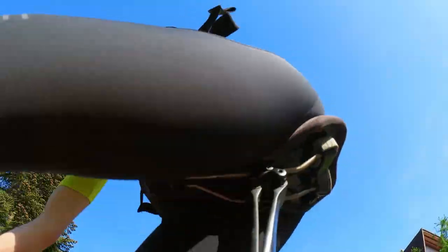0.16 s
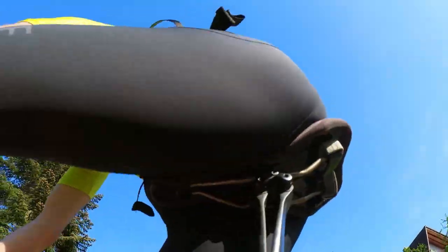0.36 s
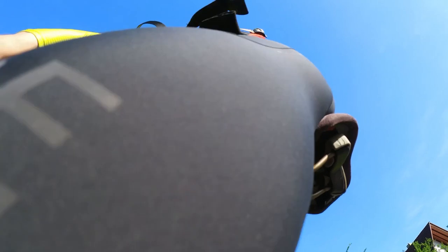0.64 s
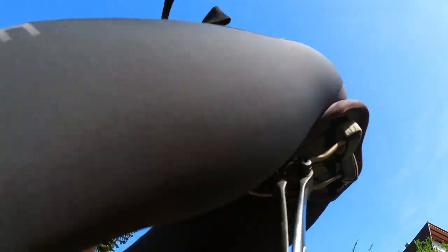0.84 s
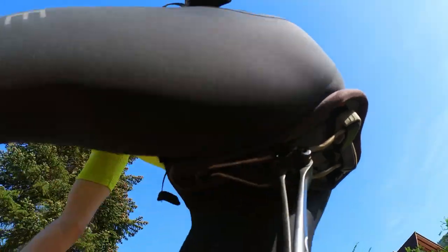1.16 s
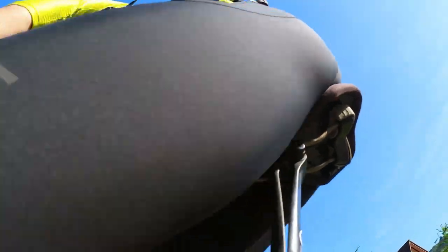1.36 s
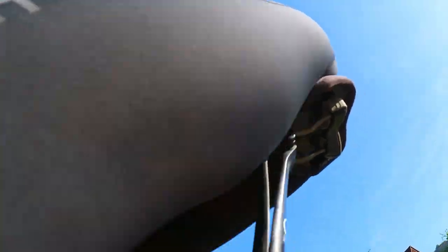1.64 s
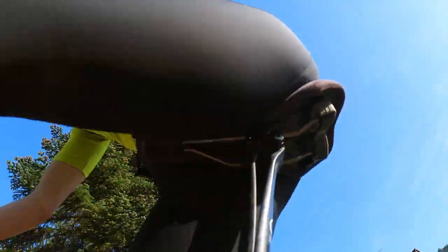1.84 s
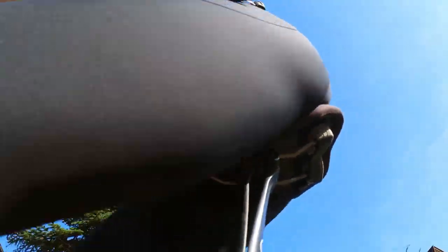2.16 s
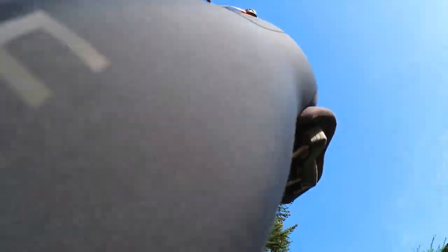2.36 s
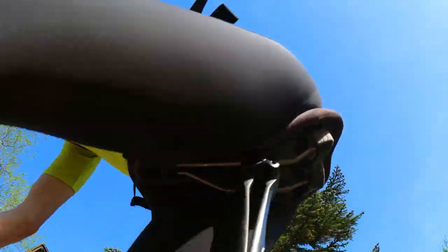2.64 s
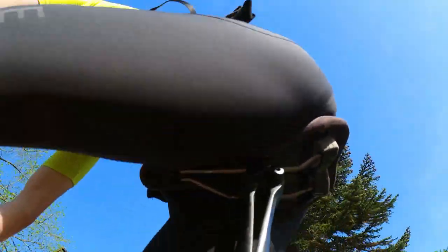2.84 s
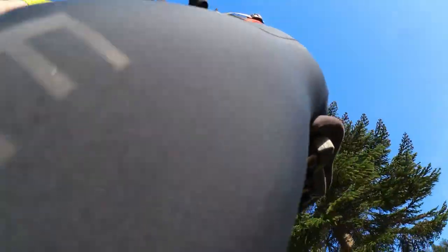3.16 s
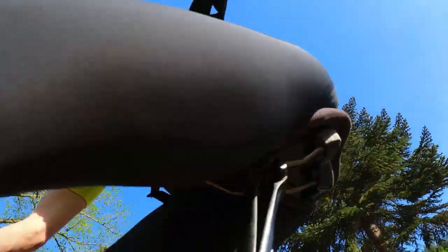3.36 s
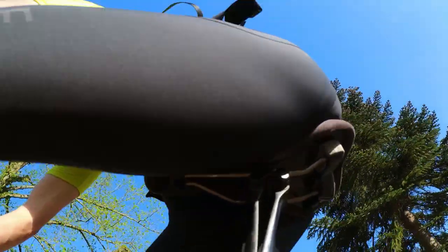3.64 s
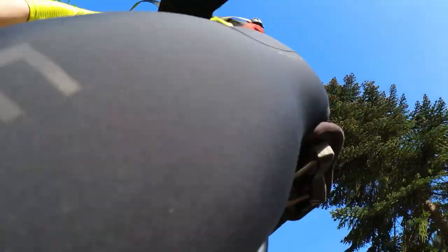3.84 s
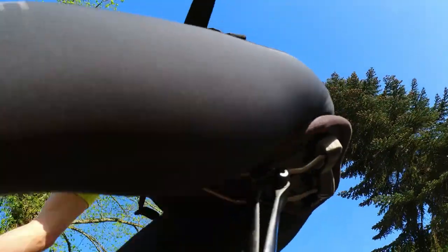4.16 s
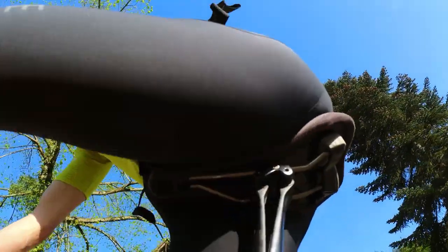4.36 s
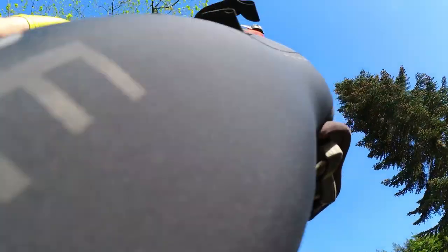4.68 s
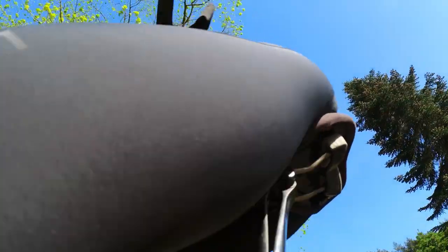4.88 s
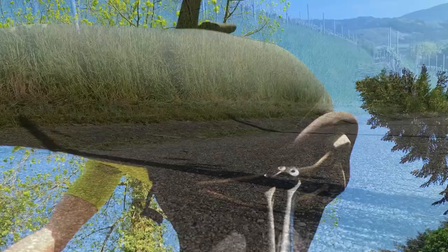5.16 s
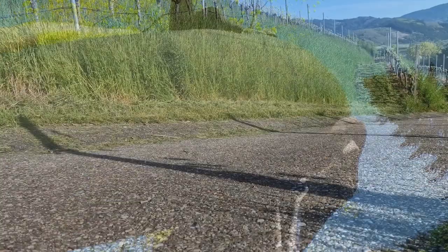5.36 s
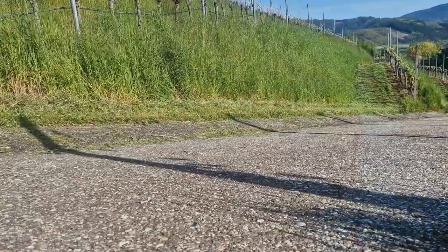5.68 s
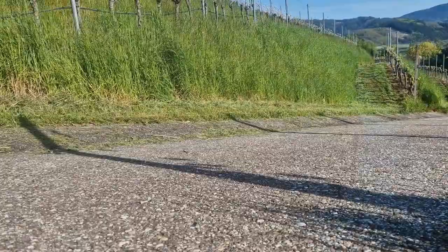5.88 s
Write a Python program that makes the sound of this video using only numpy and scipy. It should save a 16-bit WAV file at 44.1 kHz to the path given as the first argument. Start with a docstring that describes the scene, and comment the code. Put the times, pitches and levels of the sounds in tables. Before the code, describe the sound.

A harsh rattling burst clicks off into a road bike rumbling over asphalt, chain clacking and grit ticking, until an abrupt cut leaves low wind gusts.

```python
"""A road bike rolls along an asphalt lane, heard by a pair of microphone ports clamped to its frame.
First a loud, wide rattling rush clatters with jolts, ends in a knock and breaks off with a click.
Then the ride: asphalt noise excites the frame's resonances, a two-partial tone hums for the drive, impacts ring
the chain and grit ticks in step with the drive; the sound narrows to the centre now and then, under a limiter.
Late on, wind turbulence rises; the sound of the ride is cut off abruptly, leaving gusts and faint field air."""
import sys
import numpy as np
from scipy import signal
from scipy.fft import rfft, irfft, next_fast_len
from scipy.io import wavfile
from scipy.ndimage import uniform_filter1d, minimum_filter1d

SR = 44100
rng = np.random.default_rng(int(sys.argv[2]) if len(sys.argv) > 2 else 0)


def master(y):
    """Save y as 16-bit WAV."""
    cut = np.clip(np.atleast_2d(y).T, -1, 1)
    pcm = np.round(cut * 32767)  # scale
    wavfile.write(sys.argv[1], SR, pcm.astype(np.int16))


N = 265261
RIDE_START_S, RIDE_END_S = 0.0765, 5.637
T = np.arange(N) / SR
SIZE = next_fast_len(N + 8192)  # padded length of the Fourier transforms
FREQ = np.maximum(np.arange(SIZE // 2 + 1) * SR / SIZE, 1)
LEFT_RIGHT = np.array([[1], [-1]])


# Spectrum of the road's rumble in the frame. Each row: frequency in Hz, relative density in dB per Hz.
RUMBLE = [(20, -23), (50, -19), (66, -10), (86, 2), (130, 3.5), (185, 4), (215, -10), (300, -8.5),
          (390, -4.5), (470, -12), (580, -17), (730, -13), (900, -27), (1300, -40.5)]
# Rough patches of asphalt. Each row: middle in seconds, half length in seconds, rise in dB.
PATCHES = [(1.217, .06, 3.5)]
# Slack chain rattling against the frame. Each row: middle in seconds, half length in seconds, level in dB.
RATTLES = [(0.464, 0.034, -43), (1.22, 0.046, -44), (1.538, 0.035, -50), (2.008, 0.024, -46.5),
           (2.092, 0.021, -38.5), (2.204, 0.059, -53), (2.81, 0.028, -47), (3.63, 0.13, -48.5),
           (4.452, 0.14, -49), (4.635, 0.048, -48), (5.26, 0.094, -50)]
# Modes of a bump's dull thud. Each row: frequency in Hz, width in Hz, relative gain in dB.
THUD = [(430, 150, 0), (735, 150, -12)]


def road():
    """Forced vibration: asphalt, bumps and slack chain drive the frame, which rumbles, rings and crunches."""
    times, thud_db, ring_db = bumps(count=12)
    texture = walk(45)
    rough_db = sum(db * bell(s, half_s) for s, half_s, db in PATCHES)
    rumble = shake(undb(-26.0 + 1.0 * texture + rough_db), colour(RUMBLE))

    frame = frame_response()
    chatter = undb(-51.5 + 2 * texture) * crackle(count=7000, spread_db=4.0, decay_s=0.008)
    rattle_level = sum(undb(db) * bell(s, half_s) for s, half_s, db in RATTLES)
    rattle = rattle_level * crackle(count=2400, spread_db=-2.5, decay_s=0.0023)
    bump_force = blows(times, undb(ring_db), decay_s=0.003)
    ring = shake(chatter, frame) + shape((rattle + bump_force) * noise(), frame)

    jolt = blows(times, undb(thud_db), decay_s=0.0096)
    push = blows(times, undb(thud_db + 12), decay_s=.00004)
    thuds = shape(push + undb(-8) * jolt * noise(), resonances(THUD) * colour(MOUNT))
    # squaring the jolt makes only the hard bumps crunch
    crunch_colour = colour([(1500, -9), (2500, 5), (3000, -9), (4500, -13), (16000, -9)])
    crunch = shape(undb(-9) * jolt ** 2 * noise(), crunch_colour)
    return rumble + ring + thuds + crunch + knock(0.3018, db=-17)


# The larger bumps. Each row: time in seconds, relative thud level in dB, relative frame ring level in dB.
BUMPS = [(0.203, -26, -39), (1.24, -39, -35), (1.496, -25, -31), (1.778, -11, -33), (2.867, -26, -52),
         (3.434, -32, -55), (4.164, -45, -38), (4.444, -32, -49), (4.587, -30, -52), (5.218, -39, -49),
         (5.519, -38, -53), (5.604, -23.5, -51)]


def bumps(count):
    """Random excitation: times, thud and ring levels of the larger bumps and of lesser ones strewn between."""
    when = rng.uniform(RIDE_START_S, RIDE_END_S, count)
    lesser_thud_db, lesser_ring_db = -37, -58
    levels = np.array([lesser_thud_db, lesser_ring_db]) + 1 * rng.standard_normal((count, 2))
    return np.vstack([BUMPS, np.column_stack([when, levels])]).T


# Hum of the drive, following the pedalling speed. Each row: time in seconds, mean pitch in Hz.
DRIVE = [(0.08, 156.2), (0.38, 149.9), (0.6, 155.8), (0.85, 151.0), (1.15, 141.0), (1.6, 140.0),
         (2.0, 145.5), (2.3, 144.9), (2.8, 153.2), (3.35, 155.7), (3.55, 153.2), (3.87, 156.6),
         (4.3, 151.6), (4.85, 147.1), (5.6, 143.2)]
# Swells of the frame's boom. Each row: time in seconds, rise in dB.
SWELLS = [(0.679, 13.5), (1.35, 7.5), (1.94, 10.5), (3.199, 6.5), (3.57, 2), (4.05, 10.5), (4.88, 2.5)]
SWELL_S = 0.07  # half length of a swell
HUM_DB, HUM_WAVER_DB, BOOM_DB = -27, 1.5, -31.5  # resting levels of hum and boom, random waver of the hum
HUM_YIELD = 0.42  # dB the hum sinks per dB of swell


def drive():
    """Periodic meshing: the chain hums with a faint octave; a frame resonance booms and the hum yields to it."""
    swell_db = sum(db * bell(s, SWELL_S) for s, db in SWELLS)
    pitch_hz = curve(DRIVE) * (1 + 0.0069 * walk(25.275))
    phase = 2 * np.pi * np.cumsum(pitch_hz) / SR
    tone = np.sqrt(2) * (np.sin(phase) + undb(-18) * np.sin(2 * phase))
    hum = tone * undb(HUM_DB - HUM_YIELD * swell_db + HUM_WAVER_DB * walk(14))
    boom = shape(noise(), resonances([(178.9, 24.0, 0)])) * undb(BOOM_DB + swell_db)
    return hum + boom


def hum_cycles():
    """Phase as integrated frequency: cycles of the drive's mean pitch gone by, which set the jockey wheel's turn."""
    return np.cumsum(curve(DRIVE)) / SR


# Ringing of the chain against its cogs. Each row: frequency in Hz, width in Hz, relative gain in dB.
CHAIN = [(1060, 240, -1), (1810, 42, 4), (2237, 228, 19.5), (2200, 110, -7), (5550, 720, -20.5),
         (13300, 470, -18)]
SNAP_PITCH_SPREAD, BOUNCE_PITCH_SPREAD = .022, .1  # relative pitch spread
BOUNCE_S, BOUNCE_DB = .0036, -7.5  # mean delay and level step from one bounce to the next


def chain():
    """Impact and rebound: links snap onto cogs, bounce twice and scrape; faint ticks and rattle run throughout."""
    times, db = clacks()
    body = resonances(CHAIN) * colour(MOUNT)
    snaps = strike(times, db + 4, CHAIN, 1 + SNAP_PITCH_SPREAD * rng.standard_normal(len(times)))
    for k in (1, 2):
        late, size, pitch = rng.uniform(-1.1, 1, (len(times), 3)).T
        bounce_times = times + BOUNCE_S * (k + late / 3)
        bounce_db = db + k * BOUNCE_DB + 4 * size
        snaps += strike(bounce_times, bounce_db, CHAIN, 1 + BOUNCE_PITCH_SPREAD * (pitch - .5))
    weak = scatter(count=70, db=-53, spread_db=3, pitch_spread=.13, modes=CHAIN)
    scrape = shape(blows(times, undb(db - 16.0), decay_s=0.009) * noise(), body)
    rattle = shake(undb(-64.5) * crackle(count=360, spread_db=2.5, decay_s=0.01), body)
    return snaps + weak + scrape + rattle


# Stiff links snapping twice onto a cog. Each row: start in seconds, relative levels in dB of first and second snap.
CLACKS = [(0.3278, -46, -40.5), (0.409, -34, -30), (0.489, -45, -55), (0.963, -48, -52),
          (1.392, -37.5, -42), (1.9075, -52, -42.5), (1.996, -49, -44), (2.0714, -32.5, -30.5),
          (2.1560, -41, -40), (2.2380, -37.5, -36.5), (2.6490, -37, -38), (2.7302, -41.5, -39),
          (2.977, -52, -43), (3.0133, -51, -43), (3.1030, -60, -39.5), (3.6722, -38, -36),
          (3.7480, -34, -30), (3.8250, -40.5, -43), (4.3002, -37.5, -37), (4.3803, -37.5, -35.5),
          (5.2828, -38, -35), (5.3676, -30.5, -31.5), (5.4500, -45, -40.5)]
SNAP_CYCLES = 2  # hum cycles between the two snaps


def clacks():
    """Kinematic spacing: times and levels of paired snaps, their gap set by the speed of the chain."""
    start, first_db, second_db = np.transpose(CLACKS)
    gap_s = SNAP_CYCLES / np.interp(start, *np.transpose(DRIVE))
    return np.r_[start, start + gap_s], np.r_[first_db, second_db]


# Further ticks of the dry jockey wheel, mostly its hardest. Each row: time in seconds, relative level in dB.
TICKS = [(0.194, -33.5), (0.475, -33.5), (0.628, -40.5), (0.7505, -37.5), (0.866, -44.5), (1.031, -54.5),
         (1.140, -44.5), (1.333, -37.5), (1.633, -41.5), (1.777, -25), (1.934, -35), (2.140, -38.5),
         (2.391, -41), (2.514, -38.5), (2.614, -38), (2.676, -48), (2.776, -46.5), (2.796, -54),
         (2.894, -43.5), (2.953, -43), (2.968, -43), (2.992, -45.5), (3.068, -34.5), (3.442, -49),
         (3.621, -36), (3.717, -42.5), (3.871, -45), (3.991, -42.5), (4.031, -40), (4.146, -45.5),
         (4.166, -33), (4.546, -45.5), (4.607, -33), (4.649, -29), (4.730, -43), (5.310, -46.5)]
# Colour of the grit. Each row: frequency in Hz, relative density in dB per Hz.
GRIT = [(1600, -0.5), (3450, -10), (4650, -18.5), (5650, -8.5), (6550, -18.5), (7150, -7.5), (7700, -12.5),
        (8550, -12.5), (9120, -7.5), (10100, -16), (11500, -11), (12900, -2.5), (15000, -4), (16000, -6)]
# Grain sizes, coarse to fine. Each row: lowest and highest frequency in Hz, relative spray after a tick in dB.
GRAINS = [(0, 4700, -30), (4700, 6500, -28), (6500, 11500, -24), (11500, 13800, -20), (13800, 17000, -19)]
# One lone grain snapping. Each row: frequency in Hz, width in Hz, relative gain in dB.
GRAIN_SNAP = [(7150, 1100, -8), (9100, 1200, -8), (13200, 2200, 0)]
SCRAPE_DB, SCRAPE_TURN = 1, 0.55  # the grit swells once a turn of the wheel: depth, and where in the turn


def grit():
    """Granular noise: ticks trail a fine spray, each grain size crackles over tyre hiss, and lone grains snap."""
    times, db = np.vstack([TICKS, wheel_ticks()]).T
    response = colour(GRIT)
    tick_colour = response * colour([(3000, -13), (8000, -7), (13000, 3.5), (16000, 2.5)])
    out = shake(blows(times, undb(db - 8.0), decay_s=0.0055), tick_colour)
    out = out + scatter(count=300, db=-57.5, spread_db=3.3, pitch_spread=.14, modes=GRAIN_SNAP)

    spray = blows(times, undb(db), decay_s=0.0081)
    turns = hum_cycles() / CYCLES_PER_TURN
    scrape_db = SCRAPE_DB * np.cos(2 * np.pi * (turns - SCRAPE_TURN))
    for low_hz, high_hz, spray_db in GRAINS:
        band = response * ((FREQ >= low_hz) & (FREQ < high_hz))
        share = np.sqrt(np.sum(band ** 2) / np.sum(response ** 2))
        grain_level = undb(-66.5 + scrape_db + 1.4 * walk(22)) + undb(spray_db + 4.5) * spray
        grains = grain_level * crackle(count=1500, spread_db=4.0, decay_s=0.0066)
        hiss = undb(-64.5 + scrape_db + 2.6 * walk(24))
        out = out + share * shake(hiss + grains, band)
    return out


# A dry jockey wheel's round of seven ticks. Each entry: mean relative level in dB.
WHEEL_TICKS = [-55, -47.5, -48.5, -45.5, -49.5, -53, -51]
TICK_SCATTER_DB = 4.5
CYCLES_PER_TURN = 21.2  # hum cycles per turn of the wheel


def wheel_ticks():
    """Rotational periodicity: rows (s, dB) of the wheel's uneven round of ticks, their levels never quite alike."""
    steps = hum_cycles() / CYCLES_PER_TURN * len(WHEEL_TICKS)
    k = np.arange(1, int(steps[-1]))
    db = np.array(WHEEL_TICKS)[k % len(WHEEL_TICKS)] + TICK_SCATTER_DB * rng.standard_normal(len(k))
    return np.column_stack([np.interp(k, steps, T), db])


# Width of the ride. Each row: time in seconds, side gain in dB.
SPREAD = [(0.1, -1.5), (1.0, 0), (2.6, -1), (5.6, 0)]
# Moments when all but the treble narrows to the centre. Each row: start in seconds, end in seconds.
NARROW = [(0.225, 0.275), (0.42, 0.485), (1.11, 1.325), (1.505, 1.66), (1.71, 1.765), (1.995, 2.125),
          (4.36, 4.395), (4.555, 4.615), (5.08, 5.135)]
NARROW_BELOW_HZ, NARROW_FADE_S = 3200, .02


def image(x):
    """Mid-side stereo: the side level drifts through the ride, its lower part briefly removed now and then."""
    mid, side = (x[0] + x[1]) / 2, (x[0] - x[1]) / 2
    low_side = irfft(rfft(side, SIZE) * (FREQ < NARROW_BELOW_HZ), SIZE)[:N]
    narrow = sum(1. * ((T > start) & (T < end)) for start, end in NARROW)
    narrow = uniform_filter1d(narrow, int(NARROW_FADE_S * SR))
    return mid + LEFT_RIGHT * (side - narrow * low_side) * undb(curve(SPREAD))


# Spectrum of the opening rush. Each row: frequency in Hz, relative density in dB per Hz.
RUSH = [(25, -35), (78, 2), (115, -4), (165, 4), (230, -13.5), (320, -9.5), (400, -8.5), (560, -11.5),
        (690, -18), (780, -3.5), (920, -35), (1300, -27), (1850, -32), (2500, -46)]
# Width of the rush. Each row: frequency in Hz, side minus mid in dB.
RUSH_WIDTH = [(60, -14), (170, -12), (250, -5), (400, 0), (560, 11), (680, -12), (780, 5.5), (1000, 1),
              (1850, -1), (2450, 9), (4400, -9), (16000, 1)]
# Jolts clattering through the rush. Each row: time in seconds, peak in dB before mount and limiter.
JOLTS = [(0.0055, -16), (0.0175, -16), (0.0235, -16), (0.0335, -10), (0.044, -16), (0.054, -13)]
# The mount ringing after each jolt. Each row: frequency in Hz, width in Hz, relative gain in dB.
CLATTER = [(410, 190, 0), (760, 150, 2), (990, 120, -11), (1870, 190, -13)]


def rush():
    """Broadband excitation: a wide rumble, clattering jolts, a scrape and a thin sizzle, ending in a knock."""
    body = shake(undb(-12.0 + 1.1 * walk(107)), colour(RUSH), RUSH_WIDTH)
    times, db = np.transpose(JOLTS)
    clatter = strike(times, db, CLATTER, 1 + .03 * rng.standard_normal(len(times)))
    jerks = crackle(count=2200, spread_db=1.5, decay_s=0.003)
    scrape = shake(undb(-34.5) * jerks, frame_response(), RUSH_WIDTH)
    sizzle_colour = colour(GRIT) * colour([(3000, 3), (8000, -6.0), (13000, 3.0), (16000, 6.0)])
    sizzle = shake(undb(-37.5 + 1.5 * walk(100)), sizzle_colour, RUSH_WIDTH)
    last = knock(0.0628, db=-12.5)
    return limiter(body + clatter + scrape + sizzle + last, ceiling_db=-7.5, hold_s=0.0034)


# First crack of a hard knock on the frame. Each row: frequency in Hz, width in Hz, relative gain in dB.
CRACK = [(850, 220, 3), (1650, 480, 1), (2250, 520, -3)]
# Body of that knock. Each row: frequency in Hz, width in Hz, relative gain in dB.
KNOCK = [(450, 95, 0), (800, 170, -11), (1160, 110, -12), (2050, 300, -19)]


def knock(s, db):
    """Two-stage impact: a sharp crack, then the frame rings with a low body as the part seats."""
    return strike(s, db, CRACK) + strike(s + .004, db, KNOCK)


def cut_clicks():
    """Step discontinuity: a dry click where the sounds of the rush and the ride are each cut off."""
    return blows([RIDE_START_S, RIDE_END_S], -undb([-20, -34]), decay_s=0.0004)


# Wind on the microphone. Each row: time in seconds, mean level in dB.
GUST = [(4.9, -77), (5.02, -34), (5.3, -36), (5.6, -36), (5.638, -48), (5.652, -48), (5.657, -28),
        (5.7, -28), (5.735, -37.5), (5.79, -35), (5.87, -35), (5.93, -32), (6.01, -37.5)]
# Spectrum of the wind. Each row: frequency in Hz, relative density in dB per Hz.
WIND = [(15, -22.5), (45, -4), (80, 0.5), (125, -8), (180, -13), (250, -26.5), (400, -36.5), (1000, -48.5),
        (2500, -84.5)]
# Brief flutters of air across the ports. Each row: middle in seconds, half length in seconds, level in dB.
FLUTTERS = [(5.657, .004, -45), (5.827, .006, -54)]
# Spectrum of a flutter. Each row: frequency in Hz, relative density in dB per Hz.
FLUTTER = [(300, 3), (700, -10), (1400, -21)]
# Single eddies thumping the microphone. Each row: time in seconds, pitch in Hz, level in dB, left minus right in dB.
EDDIES = [(5.035, 48, -26, 4), (5.085, 90, -20, 0), (5.31, 70, -22, 2), (5.667, 70, -20.5, -11),
          (5.694, 64, -16, -10), (5.841, 64, -19.5, 0)]


def wind():
    """Turbulent pressure: low uneven noise and brief flutters at the ports, and eddies that push and pull."""
    unsteady_db = 1.5 * walk(45)
    width = [(20, -21.5), (300, -12.5), (1200, -10.5), (16000, -7.5)]
    out = shake(undb(curve(GUST) + unsteady_db), colour(WIND), width)
    flutter_level = sum(undb(db) * bell(s, half_s) for s, half_s, db in FLUTTERS)
    out = out + shape(flutter_level * noise(), colour(FLUTTER))
    for s, hz, db, pan_db in EDDIES:
        cycles = (T - s) * hz
        eddy = np.sin(2 * np.pi * cycles) * np.exp(-(cycles / 0.52) ** 2)
        out = out + eddy * undb(db + LEFT_RIGHT * pan_db / 2)
    return out


# Spectrum of distant air and rustling grass. Each row: frequency in Hz, relative density in dB per Hz.
FIELD = [(200, 5), (1100, 0.5), (2000, -3.5), (2750, -9.5), (3400, -3.5), (4600, -15), (6200, -19),
         (8000, -8), (10000, -23.5), (16000, -26.5)]
# Loudness of that air and grass. Each row: time in seconds, mean level in dB.
RUSTLE = [(4.9, -83), (5.26, -66), (5.8, -66), (5.85, -63.5), (6.01, -66.5)]


def field():
    """Diffuse sound: faint air and grass as independent flickering noise in each ear, rising late."""
    air = np.array([shape(noise() * undb(1.6 * walk(24)), colour(FIELD)) for _ in range(2)])
    return air * undb(curve(RUSTLE) + 1.2 * walk(8.3))


# Ringing of frame and mount. Each row: frequency in Hz, width in Hz, relative gain in dB.
FRAME = [(1020, 60, 2), (1160, 28, -0.5), (1473, 150, -14), (1714, 235, -5.5), (1852, 130, 4.5),
         (2083, 82, -14), (2240, 100, -20.5), (2400, 390, -7)]
# What the microphone mount lets through from the frame. Each row: frequency in Hz, gain in dB.
MOUNT = [(2480, -10.5), (2950, -22.5), (4800, -5.5), (5600, -1.5), (16000, -4)]


def frame_response():
    """Modal superposition: magnitudes of the frame's modes added up, heard through the mount."""
    return sum(abs(resonances([mode])) for mode in FRAME) * colour(MOUNT)


# Width of the ride before it is narrowed. Each row: frequency in Hz, side minus mid in dB.
WIDTH = [(30, -2), (90, -18), (170, -20.5), (230, 1.5), (400, -12), (600, -7.5), (740, -13.5), (950, 0),
         (1050, -15), (1300, -5), (2200, -15), (4500, -6.5), (10000, -5.5), (16000, -10.5)]


def shake(force, response, width=WIDTH):
    """Partial coherence: random contact of given strength rings a body; the two ports hear it partly alike."""
    side_response = response * colour(width)
    share = np.sum(abs(side_response) ** 2) / np.sum(abs(response) ** 2)
    mid = shape(force * noise(), response)
    side = np.sqrt(share) * shape(force * noise(), side_response)
    return (mid + LEFT_RIGHT * side) / np.sqrt(1 + share)


def strike(times, db, modes, pitch=1):
    """Modal impact: soft-onset decaying tones of given peak and relative pitch, passed through the mount."""
    out, age = np.zeros(N), np.arange(2048) / SR
    for s, peak_db, stretch in np.broadcast(times, db, pitch):
        tone = 0
        for hz, width, gain_db in modes:
            envelope = width ** 3 * age ** 2 * np.exp(-1.5 * np.pi * width * age)
            tone = tone + undb(gain_db) * envelope * np.sin(2 * np.pi * hz * stretch * age)
        part = out[int(max(s, 0) * SR):][:len(age)]
        part += (undb(peak_db) * tone / abs(tone).max())[:len(part)]
    mount = colour(MOUNT)
    return irfft(rfft(out, SIZE) * mount / mount[0], SIZE)[:N]


def scatter(count, db, spread_db, pitch_spread, modes):
    """Random impacts: small blows at random moments and pitches, a few far harder than the rest."""
    when, size, pitch = rng.random((count, 3)).T
    peak_db = db - spread_db * np.log(np.maximum(size, .04))
    return strike(when * N / SR, peak_db, modes, 1 + pitch_spread * (2 * pitch - 1))


def crackle(count, spread_db, decay_s):
    """Shot noise: force of many tiny impacts of uneven strength, scaled to rms 1."""
    when, size = rng.random((count, 2)).T
    return unit(blows(when * N / SR, undb(-spread_db * np.log(np.maximum(size, .02))), decay_s))


def blows(times, sizes, decay_s):
    """Exponential relaxation: a force that jumps at each blow and dies away."""
    kicks = np.zeros(N)
    np.add.at(kicks, np.clip((np.asarray(times) * SR).astype(int), 0, N - 1), sizes)
    return signal.lfilter([1], [1, -np.exp(-1 / (decay_s * SR))], kicks + 1e-18)


def resonances(modes):
    """Modal resonance: summed response of squared, steep-sided second-order peaks."""
    return sum(undb(db) / (1 + 1j * (FREQ ** 2 - hz ** 2) / (FREQ * width)) ** 2 for hz, width, db in modes)


def colour(points):
    """Spectral envelope: gain per frequency from (Hz, dB) points, falling steeply above the last."""
    hz, db = np.transpose(points)
    return undb(np.interp(np.log(FREQ), np.log(hz), db)) * np.minimum(hz[-1] / FREQ, 1) ** 20


def shape(x, response):
    """Linear filtering: apply a response normalised to keep the power of white noise."""
    return irfft(rfft(x, SIZE) * response / np.sqrt(np.mean(abs(response) ** 2)), SIZE)[..., :N]


def limiter(x, ceiling_db, hold_s):
    """Look-ahead gain control: one gain for all channels keeps every crest under the ceiling."""
    size = int(hold_s * SR) | 1
    gain = np.minimum(1, undb(ceiling_db) / (abs(x).max(axis=0) + 1e-9))
    return x * uniform_filter1d(minimum_filter1d(gain, size), size)


def walk(rate):
    """Band-limited fluctuation: random levels drawn rate times a second, joined and smoothed, rms 1."""
    steps = np.interp(T * rate, np.arange(4096), rng.standard_normal(4096))
    return unit(uniform_filter1d(steps, int(SR / rate / 2) + 1))


def curve(rows):
    """Linear interpolation: the second column of a table against time in the first."""
    rows = np.array(rows)
    return np.interp(T, rows[:, 0], rows[:, 1])


def bell(s, half_s):
    """Gaussian envelope: a smooth rise and fall around one moment."""
    return np.exp(-((T - s) / half_s) ** 2)


def noise():
    """White noise: equal power at every frequency."""
    return rng.standard_normal(N)


def unit(x):
    """Power normalisation: scale to rms 1."""
    return x / np.sqrt(np.mean(x ** 2))


def undb(db):
    """Logarithmic level: decibels to amplitude gain."""
    return 10 ** (np.asarray(db) / 20)


def scene():
    """Superposition: the rush, then the limited ride, overlapped by the rising wind and the field."""
    ride = limiter(image(drive() + road() + chain() + grit()), ceiling_db=-17.0, hold_s=0.007)
    riding = (T >= RIDE_START_S) & (T < RIDE_END_S)
    rushing = np.clip((RIDE_START_S - T) / .0006, 0, 1)  # breaks off within 0.6 ms
    return rush() * rushing + ride * riding + cut_clicks() + wind() + field()


def record(dry):
    """Band limiting: the recorder cuts the top with a steep elliptic low-pass at 15950 Hz."""
    return signal.sosfilt(signal.ellip(10, .2, 80, 15950, fs=SR, output="sos"), dry)


dry = scene()
out = record(dry)
master(out)
```